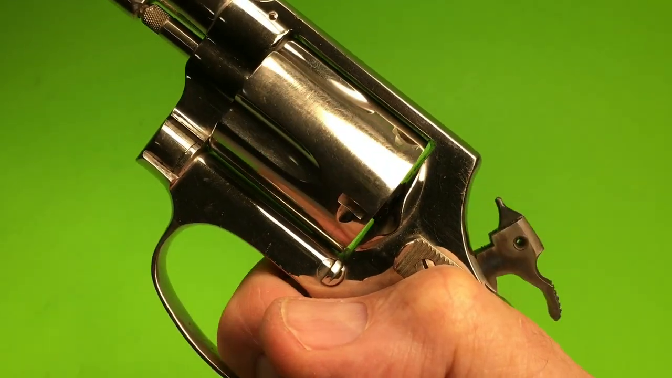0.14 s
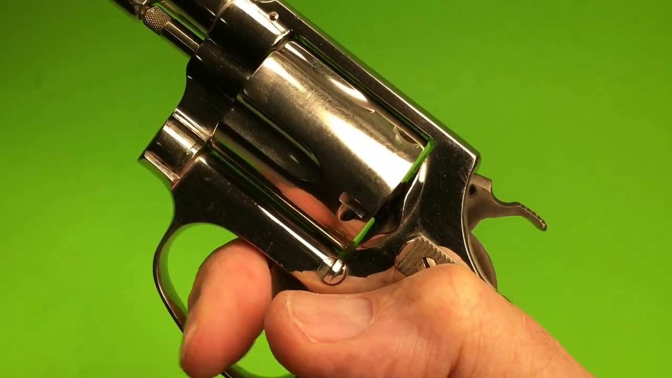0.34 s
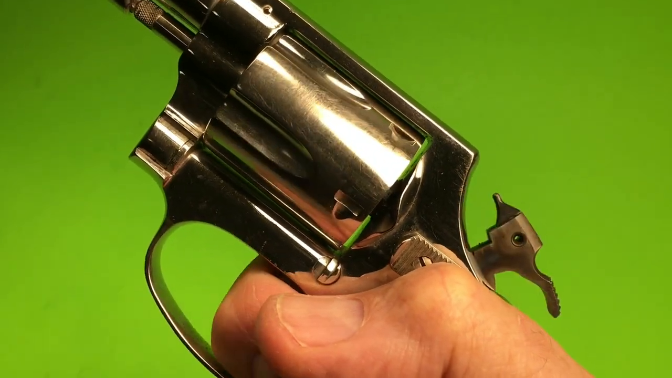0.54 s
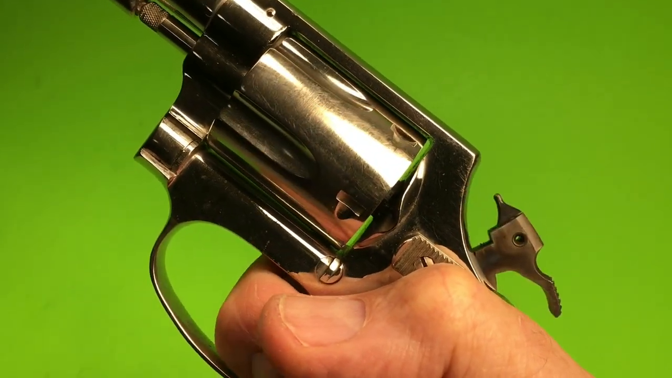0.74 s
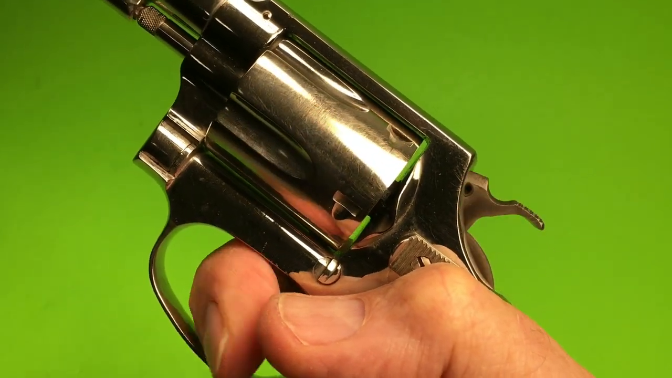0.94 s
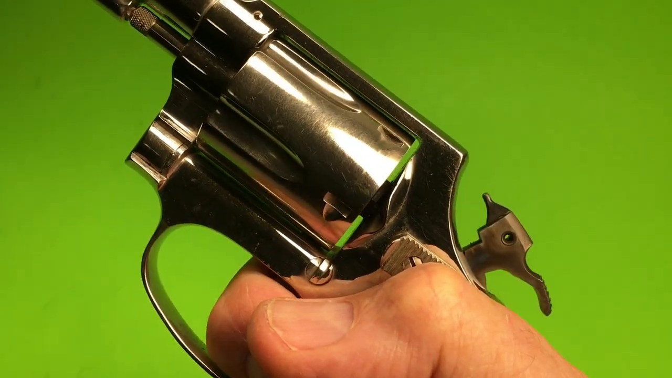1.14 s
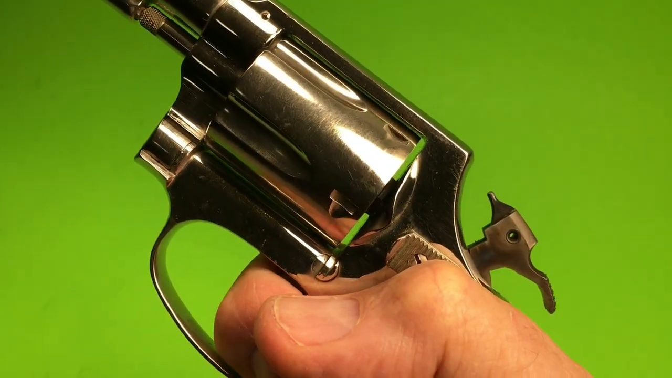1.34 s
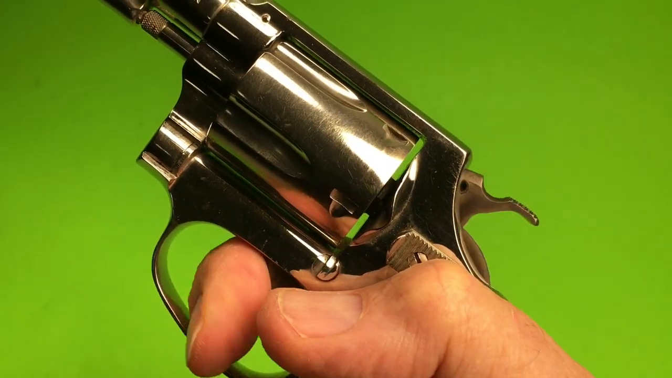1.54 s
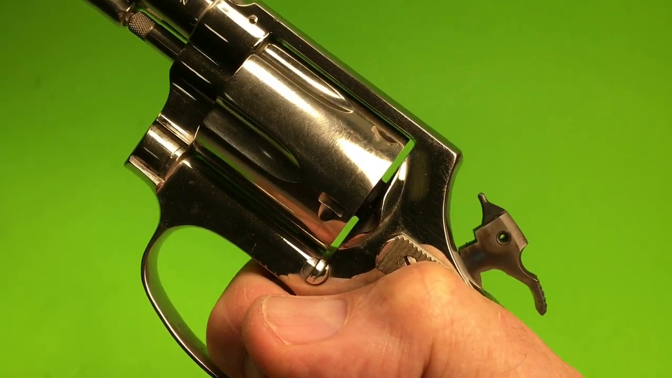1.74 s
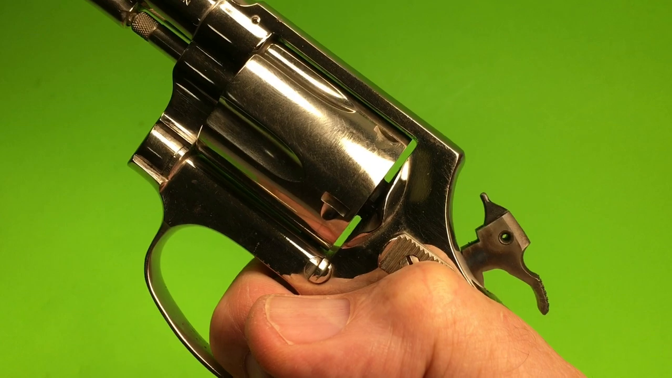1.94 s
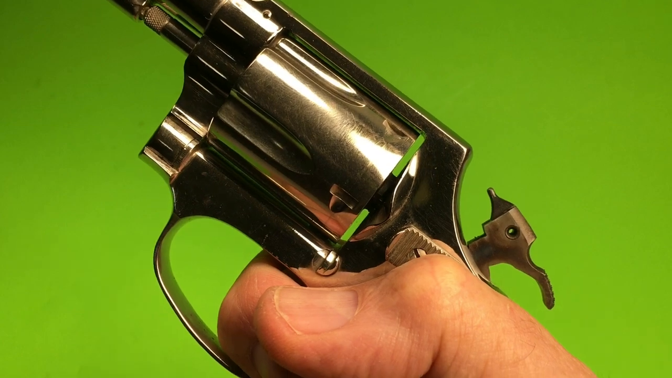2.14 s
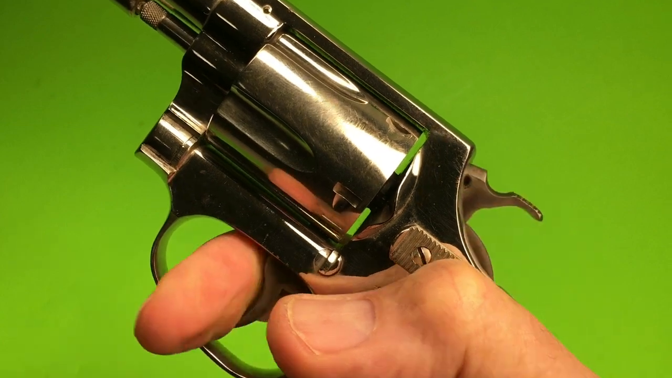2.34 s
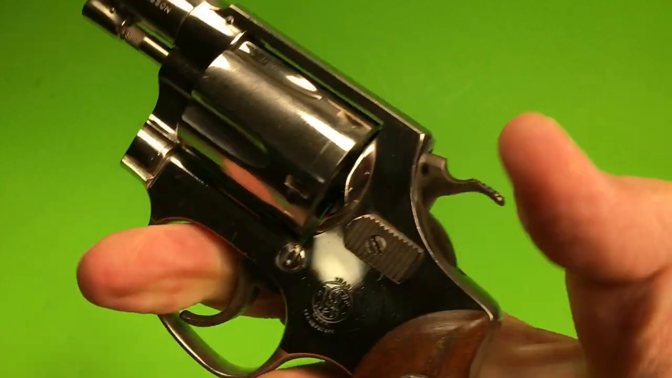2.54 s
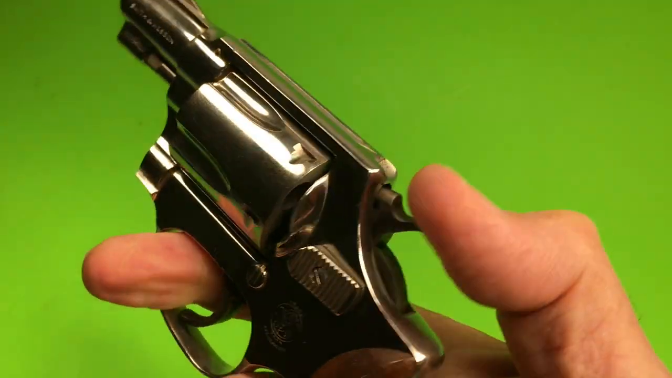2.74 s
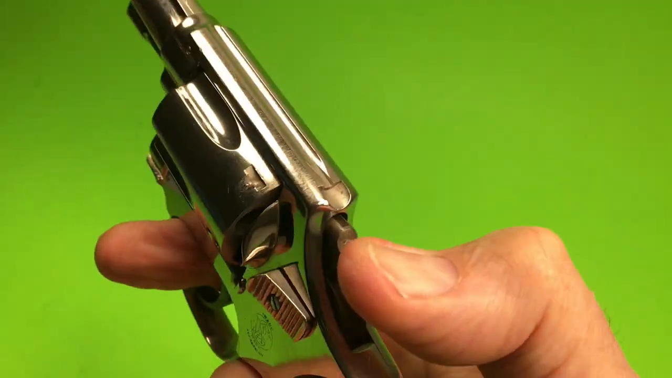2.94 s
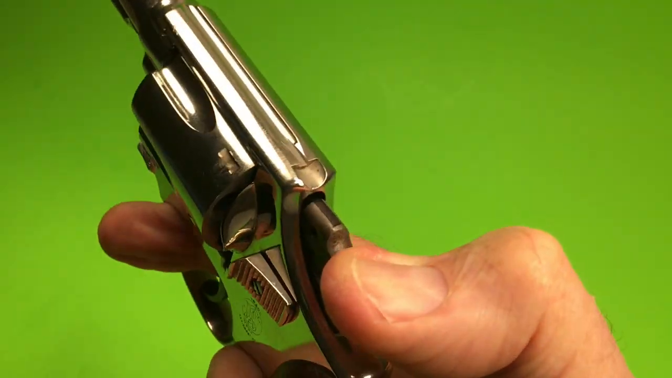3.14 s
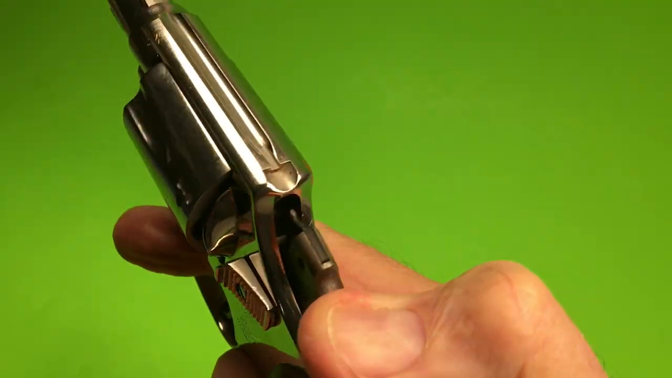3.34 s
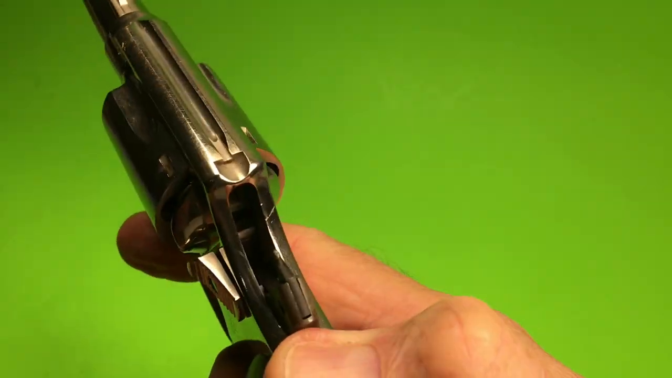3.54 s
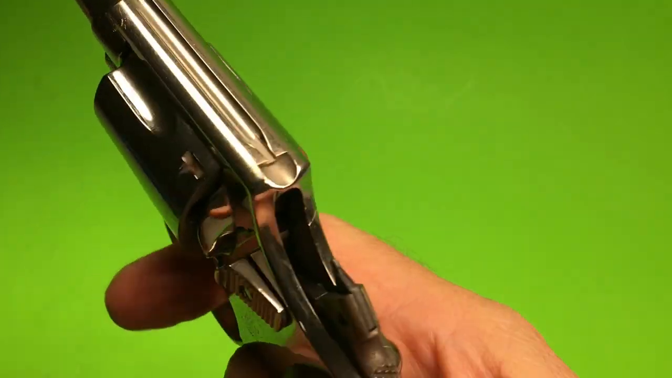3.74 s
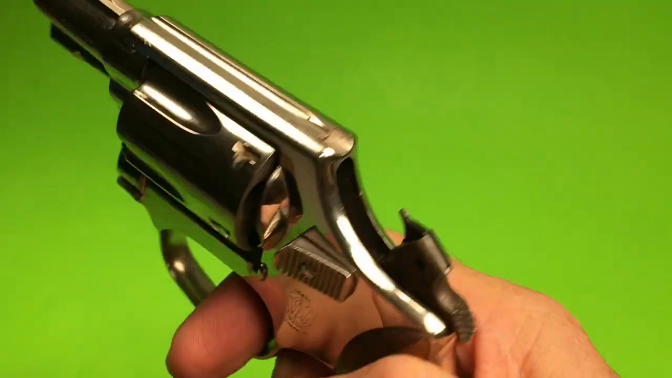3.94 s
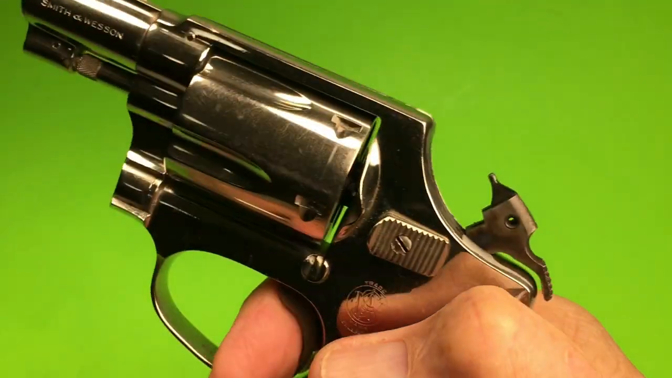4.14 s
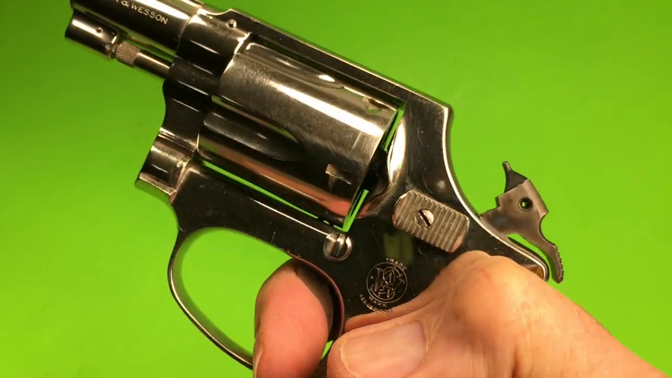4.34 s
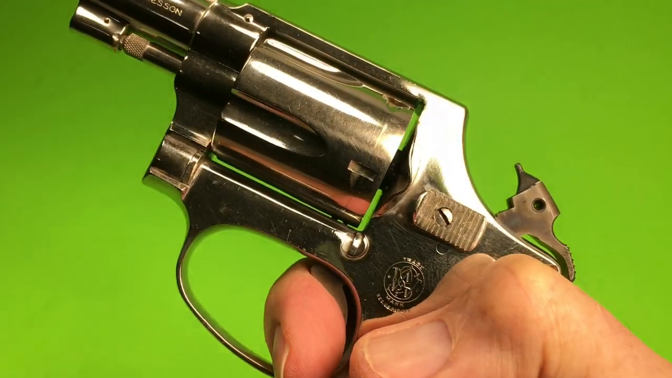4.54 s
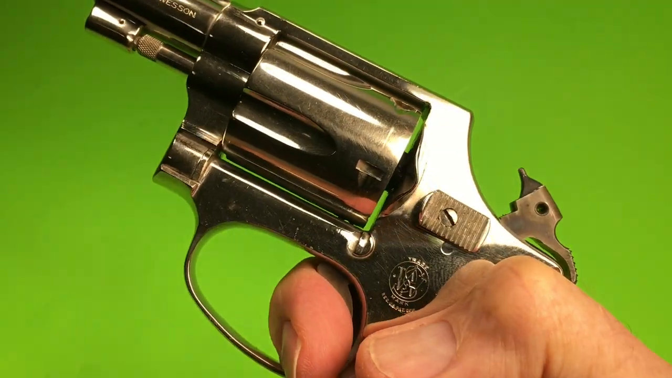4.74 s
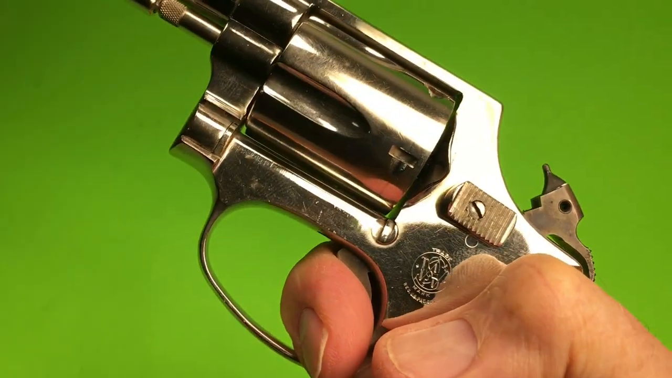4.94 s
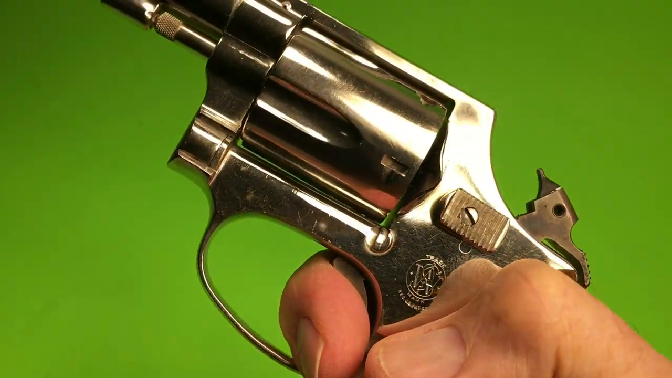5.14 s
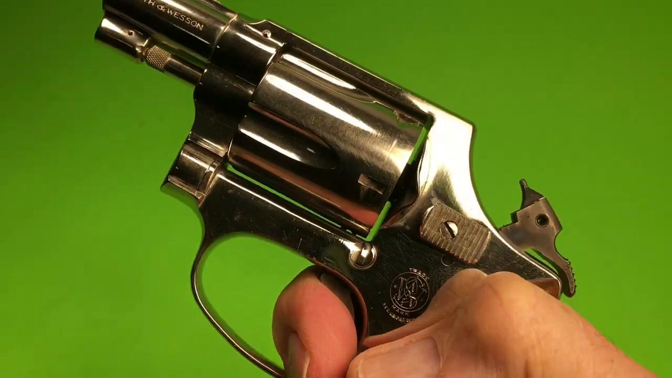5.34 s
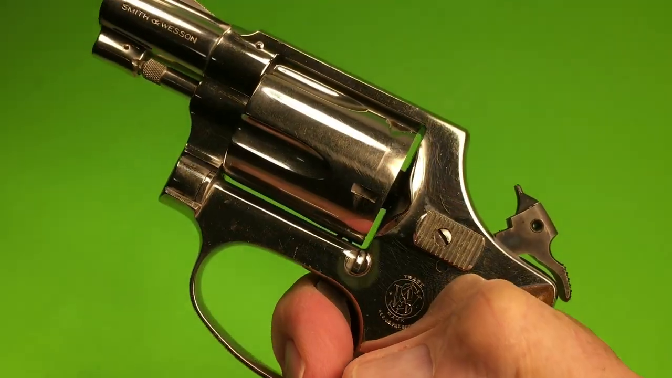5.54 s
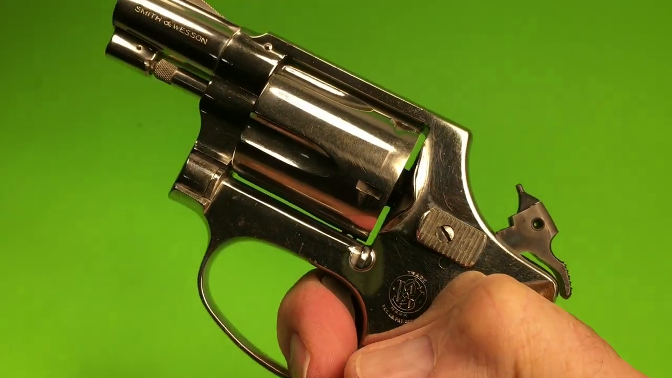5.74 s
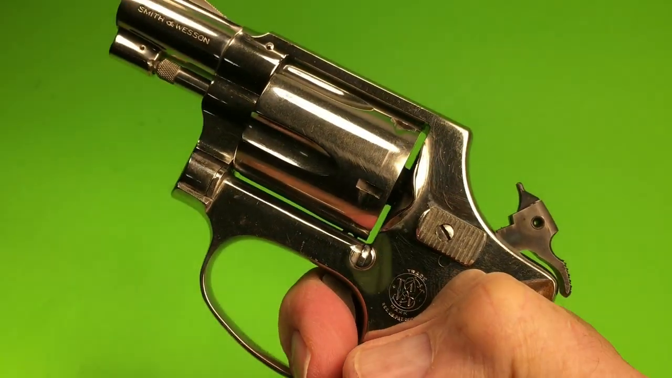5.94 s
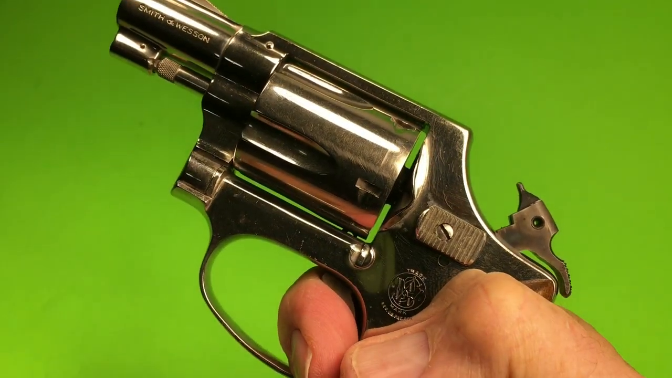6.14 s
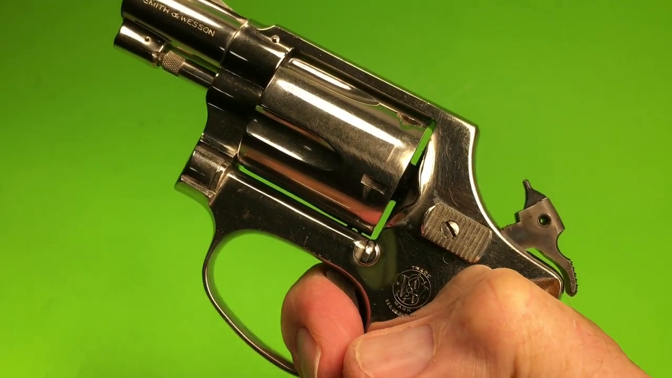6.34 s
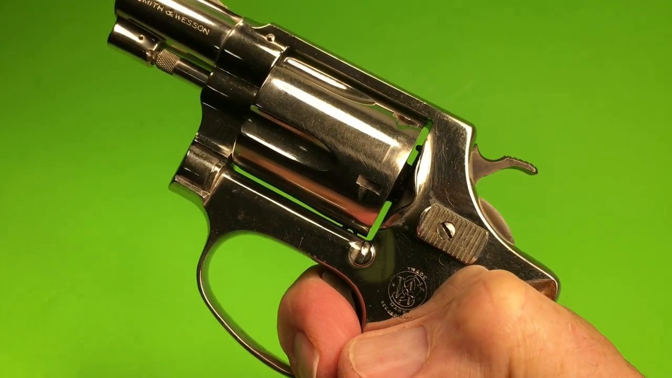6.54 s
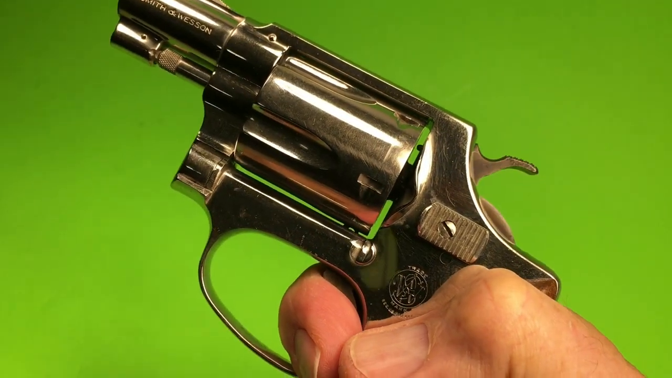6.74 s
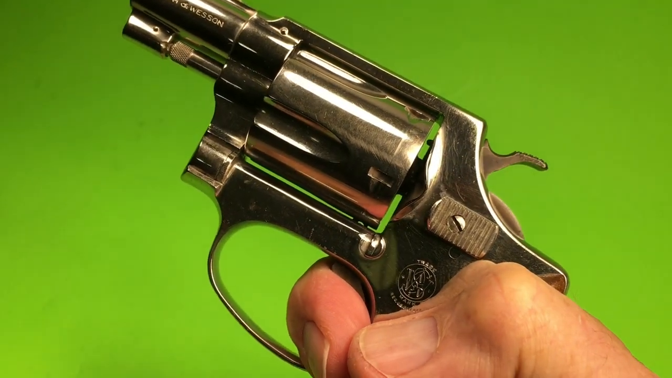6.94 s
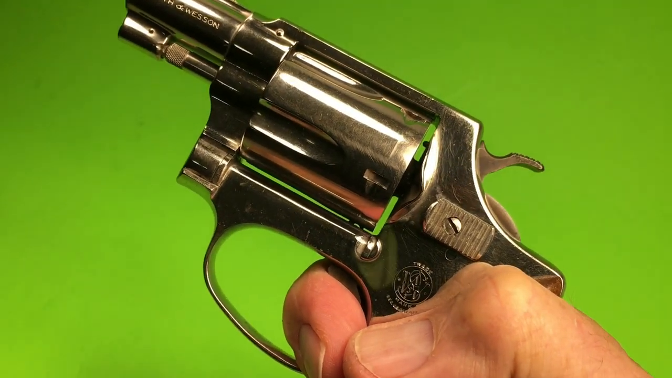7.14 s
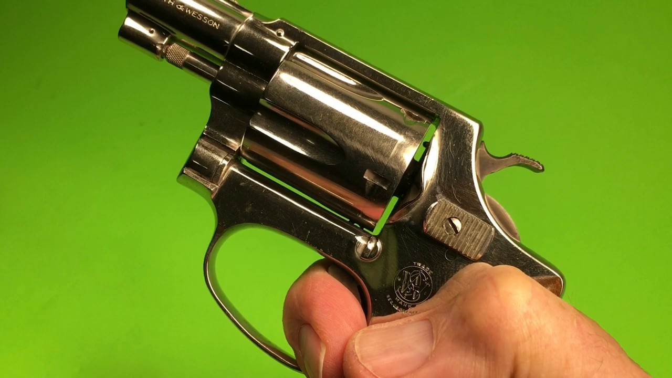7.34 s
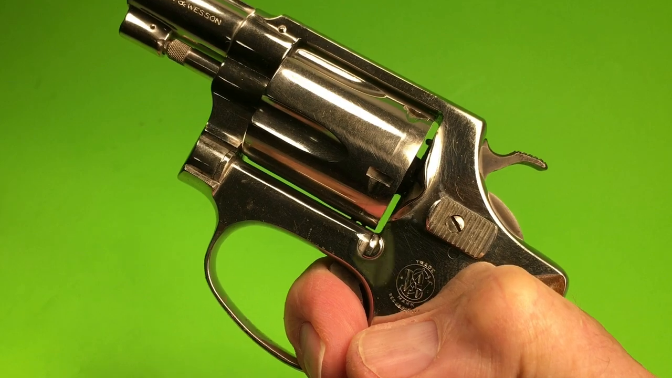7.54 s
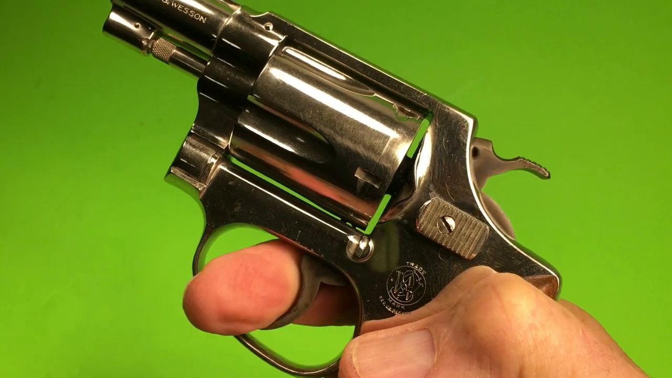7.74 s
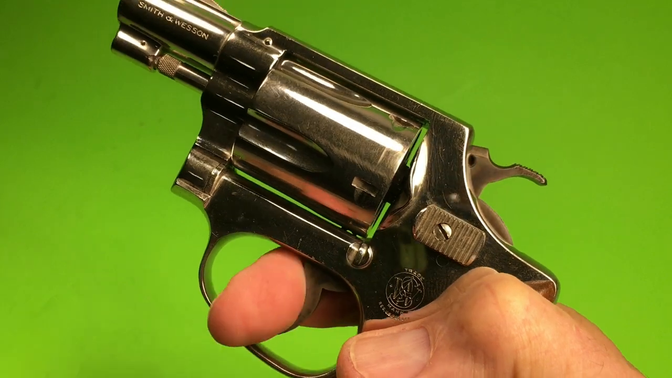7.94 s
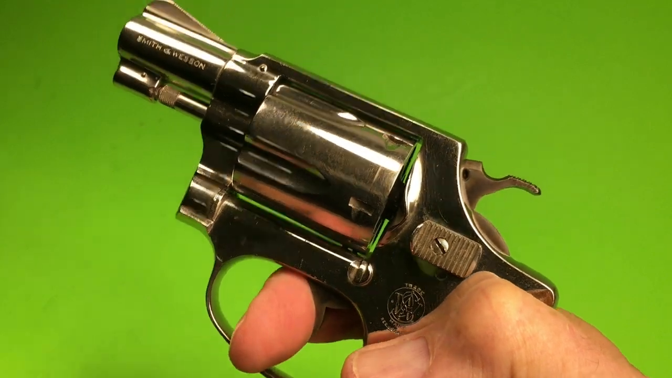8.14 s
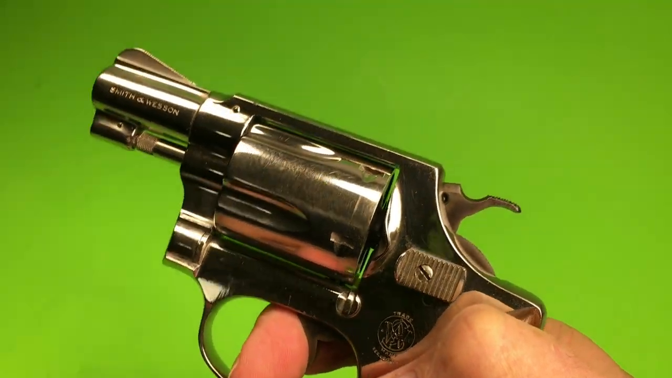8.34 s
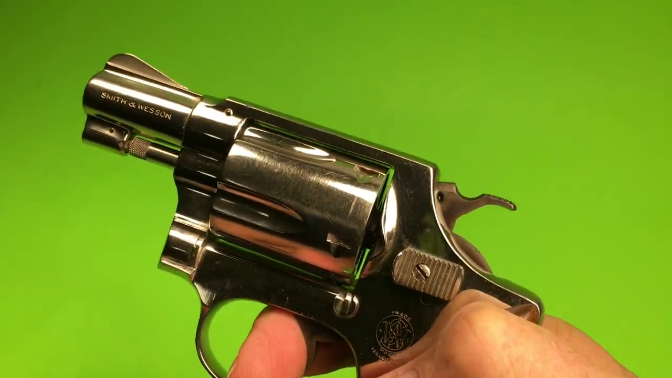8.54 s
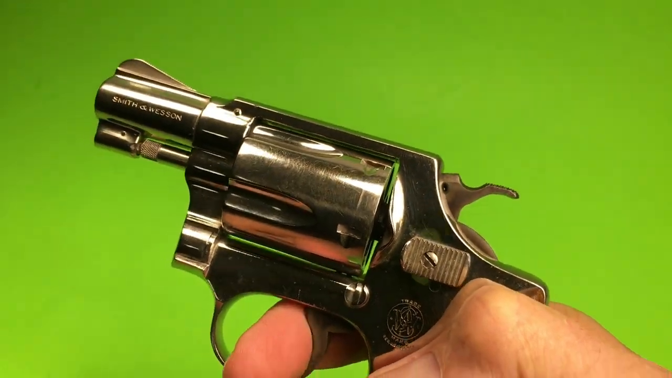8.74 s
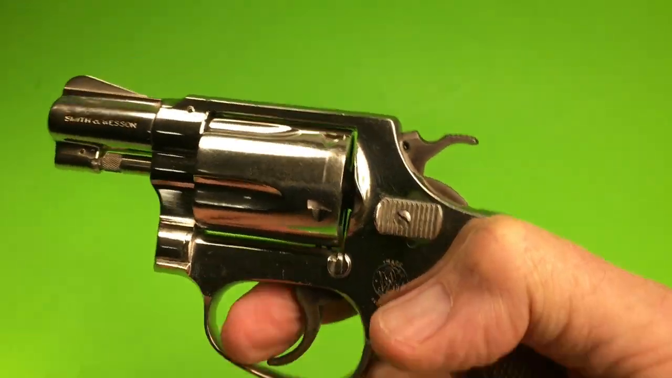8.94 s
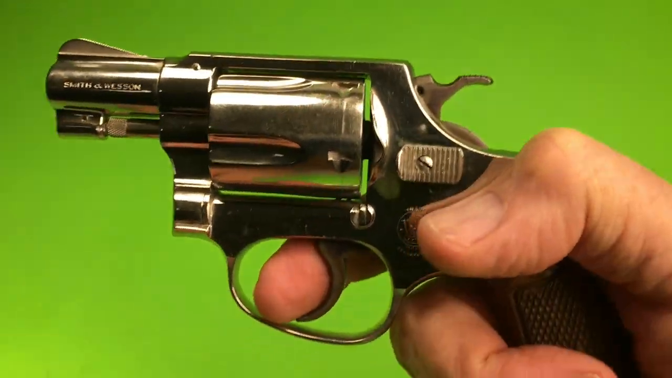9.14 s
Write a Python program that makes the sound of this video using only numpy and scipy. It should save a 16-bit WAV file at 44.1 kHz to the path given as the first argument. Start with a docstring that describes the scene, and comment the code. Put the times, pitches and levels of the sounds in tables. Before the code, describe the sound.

A revolver's steel action clicks and snaps back in quick alternation, pauses, cocks sharply, then its hammer falls hard and the trigger clacks forward.

```python
"""Hard steel clicks close by in a quiet room: a revolver is cocked and let forward several times, cocked
with the thumb, dry-fired once, and its trigger released. Each click is a few steel-on-steel blows
milliseconds apart: a spike, a noisy chatter and decaying modes. Mainspring, cylinder, hand and room add
their own modes and noise. A limiter ducks after the dry fire, and a hiss gate opens after loud clicks."""
import sys
import numpy as np
from scipy import signal
from scipy.fft import rfft, irfft, next_fast_len
from scipy.io import wavfile
from scipy.ndimage import uniform_filter1d, minimum_filter1d

SR = 44100
rng = np.random.default_rng(int(sys.argv[2]) if len(sys.argv) > 2 else 0)


def generate_wav(signal):
    """Clip the signal to [-1, 1] and save it as 16-bit WAV at the path in sys.argv[1]."""
    frames = np.transpose(np.atleast_2d(signal))
    scaled = np.clip(frames, -1, 1) * 32767
    pcm = np.round(scaled).astype(np.int16)
    wavfile.write(sys.argv[1], SR, pcm)


N = 405261

# The hammer is drawn back. Each row: catch in seconds, level in dB, level of the high ring in dB,
# lead of the pawl in seconds, pawl level in dB, pawl brightness in dB per octave, chamber pitch in Hz.
COCKINGS = [(.0003, -9, -21.5, 0.057, -25, 0, 6700), (0.596, -12.5, -8, 0.063, -25, -1, 1930),
            (1.161, -12, -26, .07, -29.5, -0.5, 1803), (1.7904, -10, -18.5, 0.065, -26.5, 3, 1813)]
# Cocked by thumb, the cylinder locks and then the sear catches.
# Each row: start in seconds, level in dB, brightness in dB per octave, level of the high ring in dB.
THUMB_COCKINGS = [(3.5586, -12, 0.5, 0), (3.5654, -5, -.5, -30)]
# The action springs forward, hits its stop and bounces twice. Each row: hit in seconds, level in dB,
# brightness of the bounces in dB per octave, travel before the stop in seconds, then the delays of
# the first and second bounce after the hit in seconds.
FORWARD_RETURNS = [(0.3196, -10, 1.5, 0.018, 0.0017, 0.005), (0.8935, -10.5, 1.5, 0.019, .0021, .0048),
                   (1.5185, -9.5, 3.5, 0.029, 0.0021, 0.0055), (2.3505, -10.5, 1.5, 0.021, .0017, .0048),
                   (7.7729, -11, -0.5, 0.0095, 0.0035, 0.0048)]
# The hammer falls at full force and rebounds.
# Each row: start in seconds, level in dB, brightness in dB per octave.
HAMMER_FALLS = [(6.5071, 5, -1.5), (6.512, 6, 1)]
# Colour of light contacts and scrapes. Each row: frequency in Hz, level in dB.
LIGHT_COLOUR = [(200, -20), (1200, -13.5), (1800, -3), (7000, -1), (15000, -3)]


def amp(db):
    """Decibels to gain."""
    return 10 ** (np.asarray(db) / 20)


def unit(x):
    """Scales to an energy of one."""
    return x / np.sqrt(np.sum(x ** 2) + 1e-20)


def read(points, hz):
    """Joins (Hz, value) points by straight lines over log frequency."""
    f, value = np.transpose(points)
    return np.interp(np.log(hz + 1), np.log(f + 1), value)


def add(mix, s, sound):
    """Mixes a sound in at time s."""
    part = mix[max(round(s * SR), 0):][:len(sound)]
    part += sound[:len(part)]


def tint(x, colour, bright_db, size=2048):
    """Causal minimum-phase filter with the given colour, tilted in dB per octave about 4 kHz."""
    hz = abs(np.fft.fftfreq(size, 1 / SR))
    octaves = np.log2(np.maximum(hz, 500) / 4000)  # no further tilt below 500 Hz
    log_gain = np.log(amp(read(colour, hz) + bright_db * octaves))
    taps = np.fft.ifft(np.exp(np.conj(signal.hilbert(log_gain)))).real
    return signal.oaconvolve(x, taps[:size // 2])[:len(x)]


def ring(t, hz, t60):
    """One mode dying by 60 dB in t60 seconds."""
    return np.sin(2 * np.pi * hz * t) * amp(-60 * t / t60)


def cluster(t, hz, t60, spread, count=14):
    """A mode split into close partials that beat unevenly as they die."""
    detune, phase = rng.uniform(-1.0, 1, (2, count, 1))
    partials = np.sin(2 * np.pi * hz * (1 + spread * detune) * t + np.pi * phase).sum(0)
    return unit(partials * amp(-60 * t / t60)) * np.linalg.norm(ring(t, hz, t60))


def around(hz):
    """The colour of a small part that resonates at hz."""
    # Each row: multiple of the pitch, level in dB.
    part_colour = [(.15, -21), (.7, -12), (1, -0.5), (1.3, -9), (3.999, -13)]
    return [(hz * ratio, db) for ratio, db in part_colour]


def room_tone():
    """Steady noise shaped into the low rumble of the room with a faint hiss."""
    # Colour of the room tone. Each row: frequency in Hz, relative level in dB per Hz.
    air_colour = [(20, -23.5), (45, -4.5), (80, -8.5), (120, 0.5), (150, -7), (190, 0.5), (280, -13),
                  (345, -10), (450, -20), (800, -28), (3300, -40), (15000, -48.5)]
    level_db = -54
    size = next_fast_len(N, real=True)
    gain = amp(read(air_colour, np.fft.rfftfreq(size, 1 / SR)))
    noise = irfft(rfft(rng.standard_normal(size)) * gain, size)[:N]
    return amp(level_db) * np.sqrt(N) * unit(noise)


def room(x, size=256, order=3):
    """A near echo, then a diffuse tail: each band stores the energy it is fed and lets it die away."""
    # Reverberation. Each row: frequency in Hz, level in dB.
    tail_colour = [(100, -25), (500, -31), (1110, -28.5), (1900, -20.5), (3660, -16.5), (5300, -17.5),
                   (6600, -19), (9200, -18), (15500, -21)]
    tail_t60_s = 0.26
    echo_s, echo_db = 0.014, -25  # from a nearby surface
    hz, _, z = signal.stft(x, SR, nperseg=size)
    fed = abs(uniform_filter1d(abs(z) ** 2, order, axis=0))
    tail_db = read(tail_colour, hz)
    keep = amp(-60 * size / SR / tail_t60_s)
    stored = signal.lfilter([0, 0, 1 - keep], [1, -keep], fed)
    noise = signal.stft(rng.standard_normal(N), SR, nperseg=size)[2]
    field = noise / np.std(noise) * np.sqrt(stored) * amp(tail_db)[:, None]
    out = signal.istft(field, SR, nperseg=size)[1][:N]
    add(out, echo_s, amp(echo_db) * x)
    return out


def fingers(grain_db=3.0, hz=3900):
    """Skin rubs over steel in a faint, grainy noise that swells and fades with each shift of the hand."""
    # Each row: peak in seconds, level in dB, swell and fade in dB per second.
    rubs = [(2.9, -64, 199), (4.119, -69.5, 81.5), (9.19, -63, 42.5)]
    t = np.arange(N) / SR
    level = sum(amp(db - slope * abs(t - s)) for s, db, slope in rubs)
    grain = unit(uniform_filter1d(rng.standard_normal(N), size=300)) * np.sqrt(N)
    rustle = tint(rng.standard_normal(N) * amp(grain_db * grain), around(hz), 0)
    return level * unit(rustle) * np.sqrt(N)


def grip(attack_cycles=0.13, stiff_cycles=0.13):
    """Heavily damped low knocks: the flesh of the hand softens the onset, and the pitch sinks as it gives."""
    # Dull knocks of the grip against hand and support.
    # Each row: start in seconds, level in dB, frequency in Hz, 60 dB decay in seconds.
    knocks = [(6.4841, -24, 531.7, .025), (6.4939, -17.5, 420, 0.091), (6.506, 0, 401.4, 0.051),
              (6.5072, 4.5, 540.3, 0.034), (6.5083, 1, 635.5, .045), (6.5115, 18, 54.27, .062),
              (7.773, -15.5, 518, 0.0067), (8.425, -34.5, 86, 0.115)]
    out, t = np.zeros(N), np.arange(SR // 4) / SR
    for s, db, hz, t60 in knocks:
        onset = 1 - np.exp(-t * hz / attack_cycles)
        cycles = hz * t + stiff_cycles * onset
        add(out, s, -amp(db - 60 * t / t60) * onset * np.sin(2 * np.pi * cycles))
    return out


def rattle(taps_db=0.5, count=70):
    """The coil of the spring shivers in many thin partials, while loose parts tap on, ever more softly."""
    # Each row: start in seconds, level in dB, 60 dB decay in seconds.
    rattles = [(6.518, -13.5, .26), (6.707, -44.5, .36), (7.785, -39, 0.23)]
    # Colour of coil and taps. Each row: frequency in Hz, level in dB.
    loose_colour = [(1300, -25), (1800, -8), (3600, 2.5), (7500, -6), (9400, -3), (10500, -12.5),
                    (15000, -18.5)]
    taps_per_s = 550
    out, t = np.zeros(N), np.arange(SR // 2) / SR
    for s, db, t60 in rattles:
        detune, phase = rng.uniform(-1, 1, (2, count, 1))
        hz = np.geomspace(1600, 14500, count)[:, None] * (1 + .015 * detune)
        coil = (np.sqrt(hz) * np.sin(2 * np.pi * hz * t + np.pi * phase)).sum(0)
        taps = rng.standard_normal(len(t)) * (rng.random(len(t)) < taps_per_s / SR)
        shiver = unit(tint(unit(coil) + amp(taps_db) * unit(taps), loose_colour, 0))
        add(out, s, amp(db - 60 * t / t60) * shiver * np.sqrt(len(t)))
    return out


def mainspring(db=-22, hz=3080):
    """The freed mainspring sings, swelling while the hammer is in flight, and rings on after it lands."""
    # Long ring after the fall. Each row: frequency in Hz, level in dB.
    spring_modes = [(2433, -31), (3634, -27), (12910, -18)]
    flight_s, lowest_t60_s = 0.0228, 0.4
    out, lands = np.zeros(N), HAMMER_FALLS[0][0]
    t = np.arange(int(flight_s * SR)) / SR
    add(out, lands - flight_s, amp(db) * t / flight_s * np.sin(2 * np.pi * hz * t))
    t = np.arange(SR // 2) / SR
    for mode_hz, mode_db in spring_modes:
        t60 = lowest_t60_s * np.sqrt(spring_modes[0][0] / mode_hz)  # higher modes die sooner
        add(out, lands, amp(mode_db) * cluster(t, mode_hz, t60, spread=0.009))
    return out


def cylinder(clank_db=-6.0, clank_t60=.016):
    """Each chamber clanks at its own pitch when caught; the cylinder rings on when cocked or let forward."""
    # Modes of the whole cylinder. Each row: frequency in Hz, level relative to the blow in dB.
    cylinder_modes = [(5120, -30), (5730, -25.5)]
    chamber_db, ring_t60_s = -32, 0.21
    out, t = np.zeros(N), np.arange(SR // 3) / SR
    for s, db, *_, hz in COCKINGS:
        clank = amp(db + clank_db) * ring(t, hz, clank_t60)
        afterring = amp(db + chamber_db) * cluster(t, hz, ring_t60_s, spread=0.075)
        add(out, s, clank + afterring)
    for s, db, *_ in COCKINGS[1:] + FORWARD_RETURNS[:-1] + THUMB_COCKINGS[:1]:
        for hz, mode_db in cylinder_modes:
            add(out, s, amp(db + mode_db) * cluster(t, hz, ring_t60_s, spread=0.035))
    return out


def high_rings(rows):
    """A short, very high ring near 15.5 kHz: one quickly dying mode with a softened onset."""
    out, t = np.zeros(N), np.arange(SR // 20) / SR
    sound = ring(t, 15520, 0.0082) * (1 - np.exp(-t / .0005))
    for s, db in rows:
        add(out, s, amp(db) * sound)
    return out


def sliding(stops, level_db, length):
    """Steel scrapes on steel in a noise that grows for length seconds up to each hard stop."""
    out, size = np.zeros(N), int(length * SR)
    for s, db, bright_db in stops:
        scrape = tint(rng.standard_normal(size) * np.linspace(0, 1, size), LIGHT_COLOUR, bright_db)
        add(out, s - size / SR, amp(db + level_db) * unit(scrape) * np.sqrt(size))
    return out


def blows(rows, colour, spike_db, modes_db, chatter_t60, thump_db=-33, size=4096):
    """Each blow: a contact spike, a dense chatter of small parts, the frame's ring and a short low thump."""
    # Ring of frame and cylinder. Each row: frequency in Hz, level in dB, 60 dB decay in seconds.
    steel_modes = [(1823, -10, 0.047), (3290, -1, 0.032), (3830, 1, 0.01), (5800, 4.5, 0.009),
                   (6843, 1, 0.01), (9080, 3.5, 0.019), (12450, -0.5, 0.024)]
    out, t = np.zeros(N), np.arange(size) / SR
    modes = [(-1) ** k * amp(db) * ring(t, hz, t60) for k, (hz, db, t60) in enumerate(steel_modes)]
    frame = unit(sum(modes))
    thump = -amp(thump_db) * ring(t, hz=72.5, t60=0.082)
    small_parts = signal.butter(2, 600, "high", fs=SR, output="sos")  # too small to ring in the bass
    for s, db, bright_db in rows:
        fading_noise = rng.standard_normal(size) * amp(-60 * t / chatter_t60)
        chatter = unit(signal.sosfilt(small_parts, fading_noise))
        spike = amp(spike_db) * (t == 0)
        blow = tint(chatter + amp(modes_db) * frame - spike, colour, bright_db)
        # the blow's energy is set as if spread over 2 ms
        add(out, s, amp(db) * (unit(blow) * np.sqrt(.002 * SR) + thump))
    return out


def ticking():
    """Light contacts, each ringing at the pitch of the part that is touched."""
    # The trigger creeps forward in small slips before it lets go.
    # Each row: start in seconds, level in dB, pitch of the part in Hz.
    slips = [(7.7202, -34.5, 2750), (7.7329, -39.5, 4000), (7.7503, -29, 6900)]
    # Stray ticks of the lockwork as it settles or is handled.
    # Each row: start in seconds, level in dB, pitch of the part in Hz.
    stray_ticks = [(2.6402, -45.5, 9340), (2.87, -48, 11300), (2.948, -50.5, 3150), (3.133, -55.5, 3670),
                   (3.4471, -36, 12200), (3.643, -44.5, 3400), (3.7499, -41, 5870), (4.0445, -55, 3400),
                   (4.3668, -50.5, 9200), (4.8944, -54, 4380), (6.4842, -30.5, 3084), (6.586, -25, 12800),
                   (7.855, -38, 4340), (8.389, -58, 3300)]
    return sum(blows([(s, db, 0)], around(hz), spike_db=-12, modes_db=-12, chatter_t60=0.032)
               for s, db, hz in slips + stray_ticks)


def resetting():
    """The trigger resets with a lighter snap, one steel blow each time."""
    # Each row: start in seconds, level in dB.
    resets = [(0.3475, -15), (0.9319, -17), (1.5542, -14.5), (2.381, -16)]
    # Colour of the snap. Each row: frequency in Hz, level in dB.
    snap_colour = [(1200, -17), (1800, -7), (3000, -0.5), (4300, -13.5), (7300, 2), (8400, -3), (11000, -9),
                   (12600, -1.5), (14200, -9), (15500, -10.5)]
    snaps = [(s, db, 0) for s, db in resets]
    return blows(snaps, snap_colour, spike_db=-5.5, modes_db=-12.0, chatter_t60=0.025)


def returning():
    """The action scrapes forward, hits its stop and bounces; with the hammer down, the trigger bounces alone."""
    # Two parts tick past on the way forward.
    # Each row: share of the travel still to go, level in dB, brightness in dB per octave.
    passing_parts = [(0.98, -41, -3.5), (0.37, -24.5, 4)]
    # Colour of the first hard hit on the stop. Each row: frequency in Hz, level in dB.
    hit_colour = [(30, -24), (150, 2), (580, 3.5), (1100, -3), (2300, -2), (3200, -11.5), (9000, -9.5),
                  (10300, -11.5), (12400, -0.5), (13400, -9.5), (15500, -15)]
    # Colour of the action bouncing on its stop. Each row: frequency in Hz, level in dB.
    action_colour = [(30, -16.5), (300, 5), (1100, -13), (1900, -11), (3400, -1), (5000, -6.5), (5800, 4.5),
                     (6900, -1), (9200, -3.5), (10200, -9.5), (12500, -2.5), (14300, -12), (15500, -7)]
    # Colour of the trigger bouncing alone. Each row: frequency in Hz, level in dB.
    lone_trigger_colour = [(30, -17), (300, 1.5), (1500, -13.5), (3500, -1), (5300, -4), (9200, 2),
                           (10500, -5), (15500, -5.5)]
    first_db, second_db = 1.5, 0.5  # bounces relative to the hit on the stop
    ticks, stops, bounces = [], [], np.zeros(N)
    for s, db, bright_db, travel, first, second in FORWARD_RETURNS:
        ticks += [(s - share * travel, tick_db, tilt_db) for share, tick_db, tilt_db in passing_parts]
        stops.append((s, db, 0))
        pair = [(s + first, db + first_db, bright_db), (s + second, db + second_db, bright_db)]
        hammer_is_down = s > HAMMER_FALLS[0][0]
        colour = lone_trigger_colour if hammer_is_down else action_colour
        bounces += blows(pair, colour, spike_db=-6.0, modes_db=-8.0, chatter_t60=.015, thump_db=-25.5)
    passing = blows(ticks, LIGHT_COLOUR, spike_db=-7.5, modes_db=-7.0, chatter_t60=0.036)
    hits = blows(stops, hit_colour, spike_db=0.5, modes_db=-8.5, chatter_t60=0.013, thump_db=-23.0)
    scrapes = sliding(stops, level_db=-17.5, length=0.0018) + sliding(stops, level_db=-32, length=0.017)
    return passing + bounces + hits + scrapes


def cocking():
    """The pawl turns the cylinder, the cylinder locks, then the sear snaps in and rebounds."""
    # The sear snaps in and rebounds.
    # Each row: delay in seconds, relative level in dB, brightness in dB per octave.
    sear_snaps = [(0, 0, 1.5), (.002, 1.5, -1)]
    # Colour of the sear catching. Each row: frequency in Hz, level in dB.
    sear_colour = [(30, -33), (150, 7), (560, -0.5), (900, -6.5), (1800, -2.5), (2400, -6), (3400, 1),
                   (4700, -6), (5800, 2), (7000, -0.5), (11000, -7.5), (15500, -1.5)]
    # Colour of the pawl on the ratchet of the cylinder. Each row: frequency in Hz, level in dB.
    ratchet_colour = [(1300, -9.5), (1800, 0.5), (2800, -4.5), (3500, -4.5), (4000, 2.5), (4500, -10),
                      (7000, -3.5), (10200, -13.5)]
    touch_lead_s, touch_db = 0.007, -15.5  # the pawl touches the ratchet before it engages, more softly
    lock_lead_s, lock_db, lock_bright_db = 0.0362, -30, 3  # the cylinder locks before the catch
    pawl, locks, catches, highs = [], [], [], []
    for s, db, high_db, lead, pawl_db, bright_db, _ in COCKINGS:
        if s > lead:
            pawl.append((s - lead - touch_lead_s, pawl_db + touch_db, bright_db))
            pawl.append((s - lead, pawl_db, bright_db))
            locks.append((s - lock_lead_s, lock_db, lock_bright_db))
        catches += [(s + delay, db + more_db, tilt_db) for delay, more_db, tilt_db in sear_snaps]
        highs.append((s, high_db))
    return (blows(pawl, ratchet_colour, spike_db=-9, modes_db=-11.5, chatter_t60=0.025)
            + blows(locks, LIGHT_COLOUR, spike_db=-11.5, modes_db=-9.0, chatter_t60=0.011)
            + blows(catches, sear_colour, spike_db=-3.5, modes_db=-8.5, chatter_t60=0.017, thump_db=-24.5)
            + high_rings(highs))


def thumb_cocking():
    """Cylinder lock and sear catch snap one after the other, under a thumb that damps the frame's low ring."""
    # Colour under the thumb. Each row: frequency in Hz, level in dB.
    damped_colour = [(30, -28), (150, -6), (600, -4.5), (1100, -12.5), (3500, -1.5), (5100, 4), (10500, -5),
                     (13000, -1.5), (15500, -3)]
    rows = [row[:3] for row in THUMB_COCKINGS]
    snaps = blows(rows, damped_colour, spike_db=-5.0, modes_db=-7.5, chatter_t60=0.019)
    scrape = sliding(rows[:1], level_db=-34.5, length=0.013)
    return snaps + scrape + high_rings([(s, high_db) for s, _, _, high_db in THUMB_COCKINGS])


def dry_firing():
    """The hammer scrapes down, strikes steel at full force and rebounds with a long chatter."""
    # Colour of the strike. Each row: frequency in Hz, level in dB.
    strike_colour = [(80, -17.5), (600, -6.5), (1050, -14), (2300, -4), (3700, -3.5), (9200, -5.5),
                     (11000, -9), (12900, 0.5), (14000, -7.5)]
    strikes = blows(HAMMER_FALLS, strike_colour, spike_db=2.0, modes_db=-4.5, chatter_t60=0.11, thump_db=-24)
    return strikes + sliding(HAMMER_FALLS[:1], level_db=-34.5, length=0.013)


def lockwork():
    """All the steel contacts inside the revolver."""
    return ticking() + resetting() + returning() + cocking() + thumb_cocking() + dry_firing()


def scene():
    """The revolver close up, its reverberation, the hand that holds it and the room tone."""
    steel = rattle() + mainspring() + cylinder() + lockwork()
    return (room_tone() + room(steel) + fingers() + grip() + steel)[None]


def hiss_gate(x, open_db=-51, hold=0.4006, order=7):
    """A loud onset lets more hiss through, and the gate holds open for a moment."""
    size = int(hold * SR) // 2 * 2 + 1
    heard = signal.sosfilt(signal.butter(2, [2000, 6000], "band", fs=SR, output="sos"), x)
    level = uniform_filter1d(heard ** 2, size=700)
    onset = (level > amp(open_db) ** 2) & (level > 2 * np.roll(level, 700))  # loud and rising
    is_open = -minimum_filter1d(-1. * onset, size, origin=size // 2, mode="constant")
    lift = [(300, -2.0), (2500, 11.0), (6000, 13), (14000, 10.0)]  # (Hz, dB more when open)
    hz, t, z = signal.stft(x, SR, nperseg=256)
    power = uniform_filter1d(uniform_filter1d(abs(z) ** 2, order, axis=0), order, axis=1)
    floor = np.median(power, axis=1, keepdims=True)
    extra = (amp(read(lift, hz)) ** 2 - 1)[:, None] * np.interp(t, np.arange(N) / SR, is_open)
    z = z * np.sqrt(abs(1 + extra * floor / np.maximum(power, floor)))  # acts mostly near the floor
    return signal.istft(z, SR, nperseg=256)[1][:N]


def limiter(x, recovery_db_per_s=25):
    """Sustained power above the ceiling pulls the gain down fast; it creeps back."""
    ceiling_db = -9
    power_db = 10 * np.log10(abs(uniform_filter1d(x ** 2, size=400)) + 1e-12)
    fall = np.arange(N) / SR * recovery_db_per_s
    duck_db = np.maximum.accumulate(np.maximum(power_db - ceiling_db, 0) + fall) - fall
    return x * amp(-np.concatenate([np.zeros(110), duck_db])[:N])  # the duck is shifted by 110 samples


def record(dry):
    """Low cut, hiss gate, limiter, overload and band limit."""
    x = signal.sosfilt(signal.butter(1, 22, "high", fs=SR, output="sos"), dry[0])
    x = np.clip(limiter(hiss_gate(x)), -1, 1)
    band_limit = signal.firwin(301, 16050, window=("kaiser", 8), fs=SR)  # treble edge in Hz
    return signal.oaconvolve(x, band_limit, "same")[None]


dry = scene()
out = record(dry)
generate_wav(out)
```